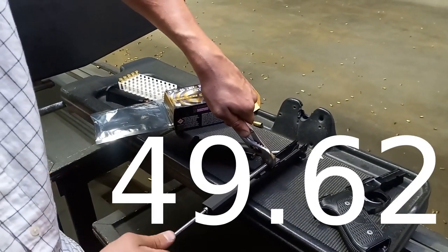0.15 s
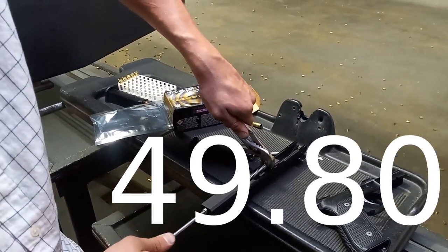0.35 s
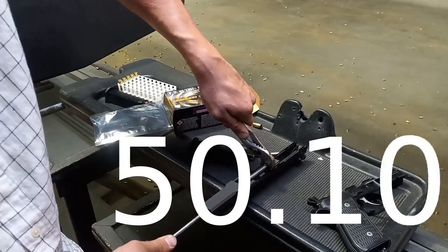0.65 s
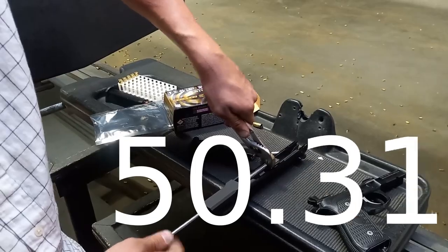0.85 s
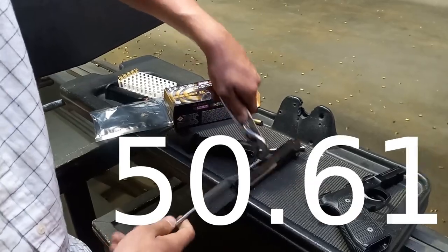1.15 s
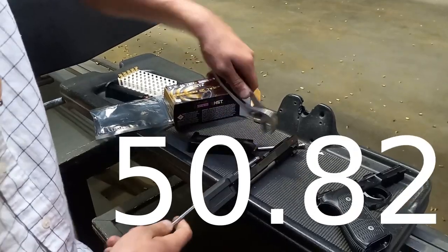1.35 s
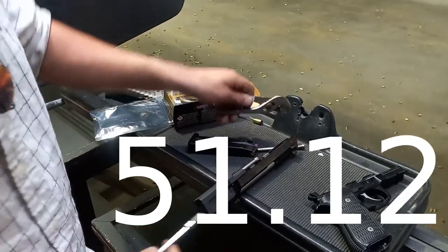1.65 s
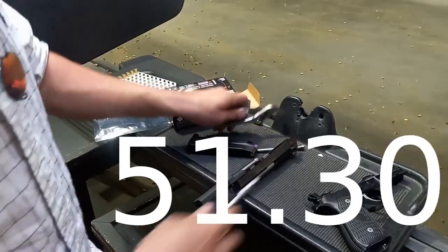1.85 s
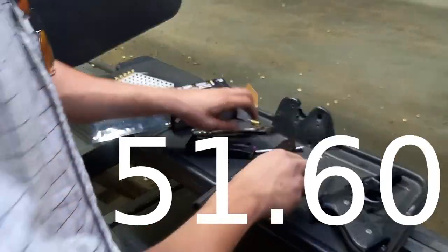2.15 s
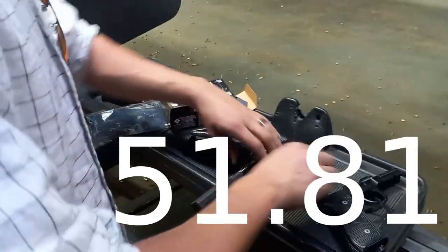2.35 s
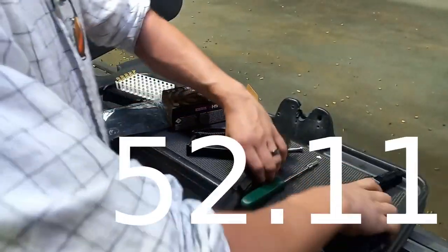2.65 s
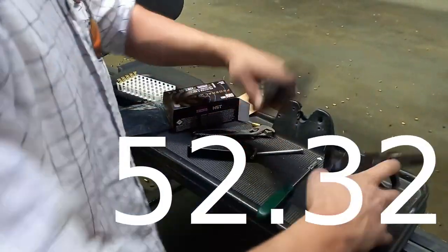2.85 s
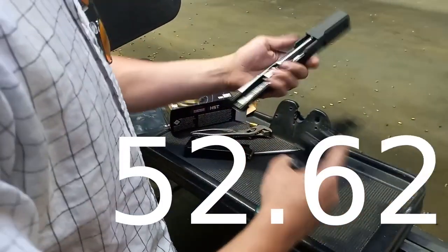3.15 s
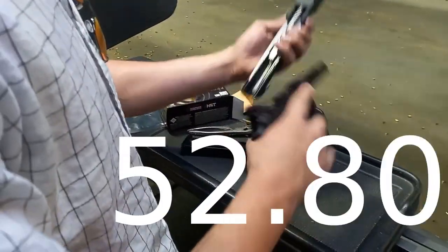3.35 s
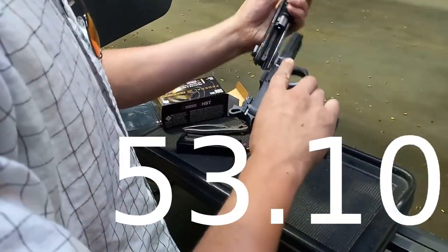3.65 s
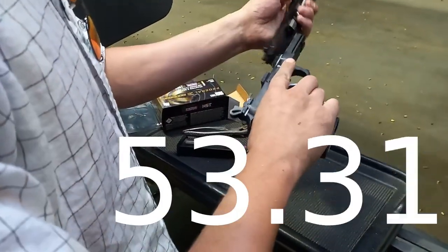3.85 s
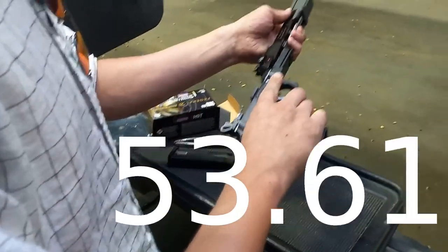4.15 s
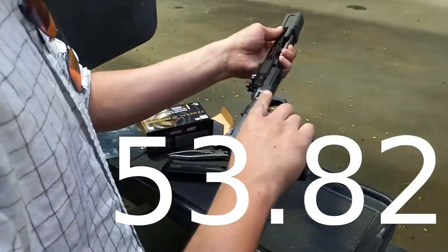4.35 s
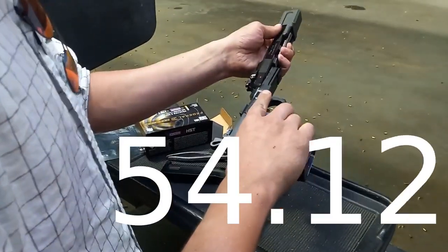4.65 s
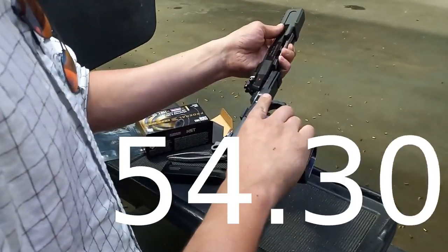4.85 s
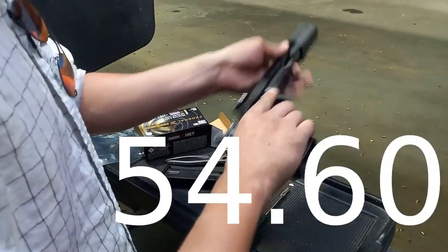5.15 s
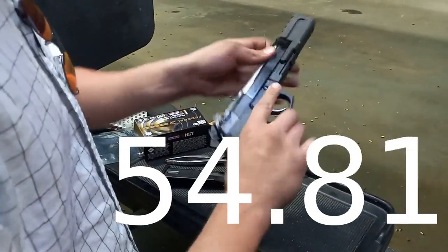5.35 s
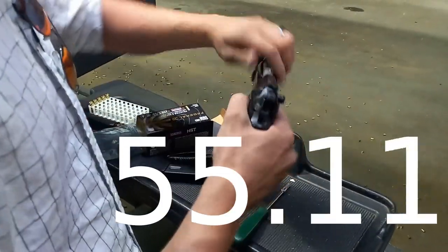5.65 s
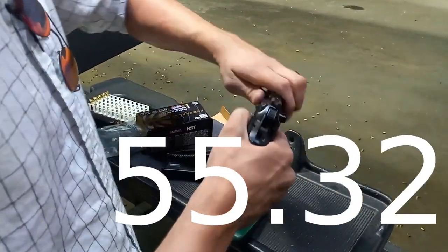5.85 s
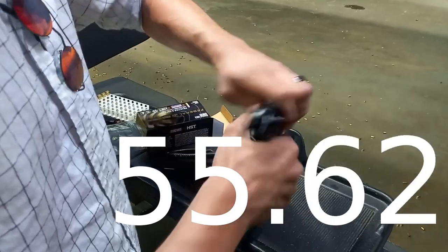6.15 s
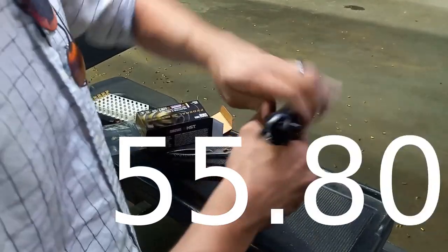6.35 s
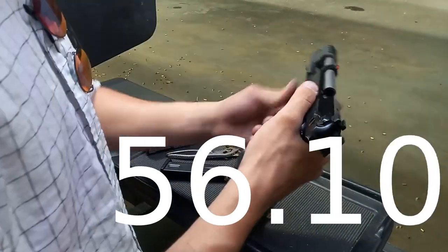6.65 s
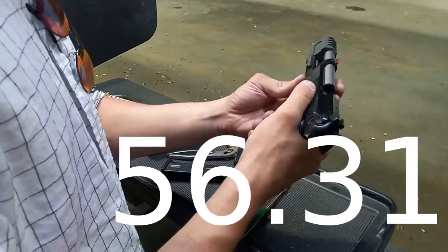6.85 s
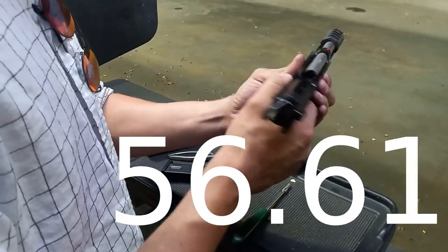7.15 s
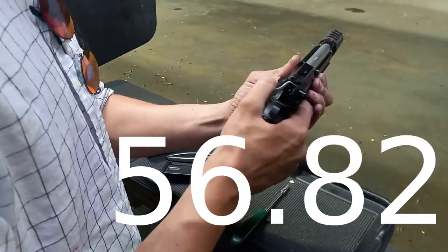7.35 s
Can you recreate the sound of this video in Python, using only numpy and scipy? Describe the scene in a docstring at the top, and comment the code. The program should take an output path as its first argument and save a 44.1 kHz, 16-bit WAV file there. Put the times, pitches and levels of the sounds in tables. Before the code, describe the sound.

A low, steady ventilation hum around 90 Hz with a soft rush of air lies under everything in a roomy, hard-walled indoor range; its level drifts, quieter near 3 s. Close up, faint rubs and tiny ticks occupy the first second, with a clearer click and dull tap of pliers at 1.2 s. From 2.0 to 2.4 s tools clatter onto a hollow plastic case, with woody thuds and bright clinks, then small fading rocking knocks to about 2.65 s. Sparse soft ticks and a faint rub follow. Firm steel clicks with slight spring pings come at 3.95, 4.05, 4.35 and 4.7 s. After a thin squeak at 4.9 s, quick ticks and a rasp rising in pitch slam into hard snaps at 5.25-5.3 s. A sharp cluster cracks at 6.2-6.35 s; after a rub at 6.7 s, single snaps hit at 7.0 and 7.37 s, echoing about half a second while the hum ducks.

```python
"""At a bench in an indoor range a pistol is reassembled, over the hum and rush of the ventilation.
Duct resonances shape the ventilation noise; damped noise and struck modes make knocks on a plastic case,
clinks of tools and ticks of small parts; chattering noise makes the rubs and the closing slide.
Slide and hammer then snap: a limiter clamps on the loud snaps, so the hum ducks, and as it lets go
the hall's tail swells up."""
import sys
import numpy as np
from scipy import signal
from scipy.fft import rfft, irfft, next_fast_len
from scipy.io import wavfile
from scipy.ndimage import uniform_filter1d, minimum_filter1d

SR = 44100
rng = np.random.default_rng(int(sys.argv[2]) if len(sys.argv) > 2 else 0)


def persist_wave(psi):
    """Save psi, clipped to +-1, as 16-bit WAV."""
    counts = np.round(np.clip(psi, -1, 1) * 32767).astype(np.int16)
    wavfile.write(sys.argv[1], SR, np.atleast_2d(counts).T)


N = 330750  # samples, 7.5 s

# Level of the ventilation hum. Each row: time in seconds, level in dB.
VENT_LEVEL = [(0, -45), (1.1, -45.5), (1.9, -48.5), (2.2, -48.5), (3.2, -55), (3.8, -50), (4.05, -45),
              (4.6, -45.5), (5.15, -46), (5.9, -51.5), (6.8, -47), (7.25, -47.5)]
# Spectrum of the rush of air. Each row: frequency in Hz, relative level in dB.
RUSH_SPECTRUM = [(60, -53), (110, -15.5), (190, -12.5), (330, -13.5), (430, -23.5), (525, -20.5),
                 (620, -23), (960, -27), (1130, -21.5), (1430, -36), (2200, -36), (7100, -56.5),
                 (13000, -51.5), (16000, -54)]
# Resonances of the duct. Each row: frequency in Hz, width in Hz, relative level in dB.
DUCT_RESONANCES = [(59.3, 4.1, -27.5), (89.1, 3.4, 0), (110.9, 29.4, -8.5)]
# Likeness of the rush in the two channels. Each row: frequency in Hz, correlation from 0 to 1.
RUSH_LIKENESS = [(60, 1.0), (180, 0.99), (550, 0.98), (1650, 0.13), (4970, 0.02), (15000, 0.48)]
RUSH_DB = -57.5  # level of the rush when the hum is at its mean level
RUSH_FOLLOWS = 0.93  # share of the hum's swings in dB that the rush follows

# Decay of the hall. Each row: frequency in Hz, t60 in seconds.
HALL_DECAY = [(150, 0.58), (1000, 0.56), (2700, 0.57), (7000, 0.6), (12000, 0.5), (16000, 0.26)]
# Balance of the nearby sounds. Each row: frequency in Hz, left gain minus right gain in dB.
PORT_BALANCE = [(500, -0.5), (1400, 1.5), (2800, -8), (5500, 4.5), (9000, 5.5), (14000, 2.5)]

# Strokes of hands and steel. Each row: start in seconds, length in seconds, body in dB, treble in dB.
RUBS = [(0.225, 0.22, -60.5, -72), (0.697, 0.27, -68, -69.5), (2.97, .12, -73.5, -71.5),
        (3.589, 0.34, -69, -78.5), (4.053, 0.46, -65.5, -73.5), (6.574, 0.24, -65.5, -73.5),
        (6.717, .17, -51, -64)]
# Spectrum of a rub. Each row: frequency in Hz, relative level in dB.
RUB_SPECTRUM = [(530, -52), (900, -10), (1120, -1.5), (1530, -14.5), (2250, -2.5), (4680, -20),
                (5550, -19.5), (8660, -21.5), (11600, -15.5), (16000, -28)]
RUB_RISE_S, RUB_HOLD_S, RUB_FADE_DB = 0.025, 0.035, -1.5  # a stroke takes hold, then eases off

# Light ticks of steel parts. Each row: start in seconds, body in dB before the common trim,
# treble in dB over the body.
TICKS = [(0.0812, -53, -11), (0.975, -56.5, -6.5), (1.142, -55.5, 4.5), (1.236, -42.5, -5),
         (1.4944, -59, 5), (2.7615, -52, 1), (2.9059, -56.5, 9.5), (3.149, -64.5, 7), (3.3829, -57.5, 2.5),
         (3.923, -58.5, -2), (3.958, -34.5, -7.5), (4.053, -34, -10.5), (4.118, -52.5, 4),
         (4.3394, -32.5, -17), (4.5668, -50, 0.5), (4.7083, -42.5, 1), (4.8595, -46, -20),
         (4.927, -50.5, -7.5), (5.0813, -43.5, -17), (5.1115, -52.5, -5.5), (5.153, -42, 0),
         (5.205, -40, -7), (5.2265, -32, -10.5), (7.2082, -48, -8), (7.276, -55.5, -20)]
# Spectrum of a tick. Each row: frequency in Hz, relative level in dB.
TICK_SPECTRUM = [(400, -25), (800, -4), (1600, 3), (2200, 4), (2900, -5.5), (3800, -5), (5200, -10),
                 (6100, -2), (7000, -7.5), (9700, -11), (13700, -12.5), (16000, -35)]

# Tools and parts set down on the case. Each row: start in seconds, body in dB before the common trims,
# treble in dB over the body, thud in dB over the body.
KNOCKS = [(1.236, -43, -6, 6.5), (1.2536, -49, -19, 10), (1.2865, -48, -17, 11.5), (2.0196, -30, -21, -3),
          (2.046, -34, -12.5, -0.5), (2.0721, -44, -10, 6.5), (2.2103, -45.5, -25, 6),
          (2.327, -39.5, -11, 6.5), (2.3495, -31.5, -13.5, -11), (2.3647, -32.5, -25, -8),
          (2.4111, -33, -25, -2.5), (2.775, -56.5, -25, 8)]
# Spectrum of the clack. Each row: frequency in Hz, relative level in dB.
KNOCK_SPECTRUM = [(410, -19.5), (700, 4.5), (875, 0), (1680, -3.5), (2270, 1.5), (3990, -22), (5330, -30),
                  (6150, -26), (6650, -29), (13700, -33), (16000, -32)]
# Resonance of the hollow case. Each row: frequency in Hz, relative level in dB.
CASE_HOLLOW = [(70, -35), (120, -6), (165, 6.5), (215, 4.5), (280, -2.5), (360, 1), (463, -4), (560, -10.5),
               (700, -21), (880, -10), (1100, -23.5), (1500, -18.5), (3000, -50)]
# Modes of the case walls. Each row: frequency in Hz, relative level in dB, t60 in seconds.
WALL_MODES = [(219.7, -2.5, 0.69), (303.3, -1, 0.67), (357.7, -4, 0.43), (467, 1, 0.6), (677, -8, 0.38),
              (840, -5.5, 0.24), (875, -9, 0.43), (1230, -23, 0.19)]
# The case rocks to rest in even, fading knocks; the levels are those of the first, read as in KNOCKS.
ROCK_FROM_S, ROCK_EVERY_S, ROCK_FADE_DB = 2.531, 0.034, -6.5  # fade per knock
ROCK_DB, ROCK_TREBLE_DB, ROCK_THUD_DB = -49, -32, 6

# Loose steel tools clink together. Each row: start in seconds, level in dB.
CLINKS = [(2.020, -56), (2.089, -57), (2.155, -37.5), (2.195, -45), (2.212, -49), (2.243, -46.5),
          (2.308, -63), (2.411, -61)]
# Modes of the tools. Each row: frequency in Hz, relative level in dB, t60 in seconds.
TOOL_MODES = [(4310, -8.5, 0.14), (5820, -9, 0.17), (8100, 3, 0.049), (8600, -7, 0.3), (9270, 3, 0.072),
              (10300, -10, 0.083), (10600, 4.5, 0.034), (11200, -13, .08), (12350, -2, .09),
              (13500, 5, 0.13), (14000, -9, .07), (14750, -14, .13), (15600, -11, .13)]
# The pliers' jaws touch. Each row: start in seconds, level in dB.
JAW_TOUCHES = [(1.142, -73), (1.236, -38), (1.288, -53.5), (1.498, -58), (2.763, -62), (2.906, -51)]
# Modes of the jaws. Each row: frequency in Hz, relative level in dB, t60 in seconds.
JAW_MODES = [(3000, -0.5, 0.029), (3790, -11.5, 0.17), (4360, 5, 0.025), (5060, 2.5, 0.032),
             (10570, -7, 0.058)]
# The recoil spring pings as the slide moves. Each row: start in seconds, level in dB.
PINGS = [(3.959, -59), (4.054, -58), (4.119, -58), (4.340, -56), (4.568, -55), (4.709, -42), (4.862, -62)]
# Modes of the spring. Each row: frequency in Hz, relative level in dB, t60 in seconds.
SPRING_MODES = [(6150, 5.5, 0.033), (7111, -25, 0.13), (9640, 0, 0.18)]

# A short squeak of steel on steel, sagging in pitch.
SQUEAK_S, SQUEAK_LENGTH_S, SQUEAK_DB = 4.926, 0.105, -69
SQUEAK_HZ, SQUEAK_SAG_HZ_PER_S = 6820, 2700
# The slide is pushed home, gathering speed; pitch and level follow the speed.
SLIDE_FROM_S, SLIDE_LENGTH_S, SLIDE_SPEEDUP = 5.2, 0.099, 3.1  # the last is the exponent of the speed
SLIDE_SLOW_HZ, SLIDE_FAST_HZ, SLIDE_SLOW_DB, SLIDE_FAST_DB = 1570, 2735, -55, -25

# Hard snaps of slide, lever and hammer. Each row: start in seconds, body in dB, treble in dB over
# the body, ring of the frame in Hz.
SNAPS = [(5.253, -43.5, -3, 2280), (5.275, -41, 3.5, 1940), (5.292, -31, 4, 2800), (6.214, -52.5, 9, 2500),
         (6.224, -50.5, 6, 2230), (6.242, -56, 10, 2576), (6.255, -33, 6, 2180), (6.296, -29.5, 3, 2000),
         (6.349, -35.5, 5.5, 2600), (7.025, -28.5, 0, 3220), (7.343, -51.5, 13, 2500),
         (7.371, -30, 4, 1970), (7.38, -32.5, 7, 2120)]
# Spectrum of a snap. Each row: frequency in Hz, relative level in dB.
SNAP_SPECTRUM = [(300, -28), (600, -14.5), (1400, -12), (2100, -1.5), (3100, 0), (4100, -13), (6100, -9.5),
                 (8200, -13.5), (12000, -5), (15000, -11), (16000, -46)]
# Sprung part worked by each move. Each row: start in seconds, ring of the part in Hz,
# left gain minus right gain in dB.
MOVES = [(5.1, 13500, 2.5), (6.1, 12100, 2), (6.9, 11250, -0.5)]

CEILING_DB = -38  # short-term treble power above which the limiter acts
EDGE_HZ = 16100  # upper band limit


def amp(db):
    """A level in decibels is twenty times the logarithm of the gain."""
    return 10 ** (np.asarray(db) / 20)


def evened(x):
    """Normalisation: mean power sets the level, so the rms is scaled to 1."""
    return x / np.sqrt(np.mean(x ** 2) + 1e-30)


def peaked(x, size=176):
    """Short-term power: the loudest window of the given samples (4 ms if not given) gets an rms of 1."""
    return x / np.sqrt(uniform_filter1d((x ** 2).mean(0), size).max())


def read(points, hz):
    """Interpolation of a table along a logarithmic frequency axis."""
    f, value = np.transpose(points)
    return np.interp(np.log(hz + 1), np.log(f + 1), value)


def add(mix, s, sound):
    """Superposition: a sound is added to the stereo mix at time s."""
    part = mix[:, max(round(s * SR), 0):][:, :sound.shape[1]]
    part += sound[:, :part.shape[1]]


def colour(x, db_of):
    """Minimum-phase filtering: the folded cepstrum makes the gain db_of(Hz) causal."""
    size = 2 * next_fast_len(x.shape[-1] // 2 + 1024)
    gain = amp(db_of(np.fft.rfftfreq(size, 1 / SR)))
    cepstrum = irfft(np.log(gain + 1e-6))
    cepstrum[1:size // 2] *= 2
    cepstrum[size // 2 + 1:] = 0
    response = np.exp(rfft(cepstrum))
    return irfft(rfft(x, size) * response)[..., :x.shape[-1]]


def pair(size, same):
    """Partial coherence: two channels of white noise have the given correlation."""
    a, b = rng.standard_normal((2, size))
    return np.array([a, same * a + np.sqrt(1 - same ** 2) * b])


def two_bands(x, spectrum, split_hz=4700):
    """Crossover: coloured sound is parted into body and treble at the split frequency."""
    body = colour(x, lambda f: read(spectrum, f) - 10 * np.log10(1 + (f / split_hz) ** 10))
    treble = colour(x, lambda f: read(spectrum, f) - 10 * np.log10(1 + (split_hz / (f + 1)) ** 10))
    return body, treble


def chatter(size, depth_db, count):
    """Stick-slip: surfaces that catch, slip and bounce give an uneven gain, smoothed over count samples."""
    return amp(depth_db * evened(uniform_filter1d(rng.standard_normal(size), count)))


def left_first(x, count):
    """Time difference of arrival: sound from the left reaches the right port count samples later."""
    return np.array([x[0], np.pad(x[1], (count, 0))[:N]])


def contact(body_db, treble_db, spectrum, t60, ring_db, ring_t60, same, chatter_db):
    """Impact: a crack of dense, quickly damped modes, then a weaker, chattering after-ring."""
    t = np.arange(SR // 5) / SR
    after_ring = amp(ring_db - 60 * t / ring_t60) * chatter(len(t), chatter_db, count=130)
    onset = 1 - np.exp(-t / 0.0004)
    fall = (amp(-60 * t / t60) + after_ring) * onset
    body, treble = two_bands(pair(len(t), same) * fall, spectrum)
    return amp(body_db) * (peaked(body) + amp(treble_db) * peaked(treble))


def damped_ring(hz, width_hz, t60):
    """Damped resonance: a cluster of close modes of hand-held steel dies exponentially."""
    t = np.arange(SR // 3) / SR
    cluster = colour(pair(len(t), 0.77), lambda f: -20 * np.log10(1 + ((f - hz) / width_hz) ** 2))
    return evened(cluster) * amp(-60 * t / t60)


def ringing(blows, modes, beat_hz, beat_share, crack_db, crack_t60, spread_db=9):
    """Modal vibration: free steel rings in close, beating pairs of modes, weighted anew by every blow."""
    out, t = np.zeros((2, N)), np.arange(SR * 3 // 4) / SR
    hz, db, t60 = np.transpose(modes)[:, :, None]
    for s, blow_db in blows:
        luck, phase, split = rng.random((3, 2, len(modes), 1))
        twin_hz = hz + beat_hz * (split + 0.5)
        pairs = np.sin(2 * np.pi * (hz * t + phase)) + beat_share * np.sin(2 * np.pi * twin_hz * t)
        decay = amp(db + spread_db * (luck - 0.5) - 60 * t / t60)
        ring = (decay * pairs).sum(1)
        crack = np.diff(pair(len(t) + 1, 0.3)) * amp(-60 * t / crack_t60)
        add(out, s, amp(blow_db) * (peaked(ring) + amp(crack_db) * peaked(crack)))
    return out


def ventilation(tone_share=0.34, tone_hz=90):
    """Duct resonance: a fan tone and turbulence boom in the duct, under a broad rush of air."""
    t, f = np.arange(N) / SR, np.fft.rfftfreq(N, 1 / SR)
    level_db = np.interp(t, *np.transpose(VENT_LEVEL))
    a, b, turbulence = rfft(rng.standard_normal((3, N)))
    duct = sum(amp(db) / (1 + ((f - hz) / width) ** 2) for hz, width, db in DUCT_RESONANCES)
    boom = evened(irfft(turbulence * duct, N))
    hum = evened(boom + tone_share * np.sin(2 * np.pi * tone_hz * t))
    same = np.clip(read(RUSH_LIKENESS, f), 0, 1)
    air = np.array([a, same * a + np.sqrt(1 - same ** 2) * b])
    rush = evened(irfft(air * amp(read(RUSH_SPECTRUM, f)), N))
    rush_db = RUSH_DB + RUSH_FOLLOWS * (level_db - level_db.mean())
    return hum * amp(level_db) + rush * amp(rush_db)


def hall(x, rise_s=0.0023):
    """Reverberation: a diffuse tail builds up, then each band decays at its own rate."""
    hz, t, z = signal.stft(rng.standard_normal((2, SR)), SR, nperseg=256)
    decay = amp(-60 * t / read(HALL_DECAY, hz)[:, None]) * (1 - np.exp(-t / rise_s))
    tail = signal.istft(z * decay, SR, nperseg=256)[1]
    return signal.fftconvolve(x.mean(0)[None], tail / np.linalg.norm(tail[0]), axes=1)[:, :N]


def rubs(grain_db=3):
    """Friction: surfaces that catch and slip every few milliseconds give a grainy hiss."""
    out = np.zeros((2, N))
    for s, length, body_db, treble_db in RUBS:
        t = np.arange(0, length, 1 / SR)
        easing = amp(RUB_FADE_DB * np.maximum(t - RUB_HOLD_S, 0) / length) * np.cos(np.pi / 2 * t / length)
        pressure = np.minimum(t / RUB_RISE_S, 1) * easing
        grain = chatter(len(t), grain_db, count=150)
        body, treble = two_bands(pair(len(t), 0.27) * grain, RUB_SPECTRUM)
        hiss = evened(body) * amp(body_db) + evened(treble) * amp(treble_db)
        add(out, s, hiss * pressure)
    return out


def squeak():
    """Frictional oscillation: dry steel whistles thinly at a falling pitch."""
    out, t = np.zeros((2, N)), np.arange(0, SQUEAK_LENGTH_S, 1 / SR)
    hz = SQUEAK_HZ - SQUEAK_SAG_HZ_PER_S * t
    tone = np.sin(2 * np.pi * np.cumsum(hz) / SR)
    swell = np.sqrt(np.sin(np.pi * t / SQUEAK_LENGTH_S))
    add(out, SQUEAK_S, amp(SQUEAK_DB) * (tone * swell)[None])
    return out


def ticks(level_db=-6.0, frame_db=-11, frame_hz=2800):
    """Damped impact: small parts touch, damped by the hands, and the frame rings briefly."""
    out = np.zeros((2, N))
    for s, body_db, treble_db in TICKS:
        add(out, s, contact(body_db + level_db, treble_db, TICK_SPECTRUM, t60=0.041,
                            ring_db=-21, ring_t60=0.37, same=0.24, chatter_db=1.0))
        add(out, s, amp(body_db + frame_db) * damped_ring(frame_hz, width_hz=380, t60=0.086))
    return out


def knocks(level_db=-4, thud_level_db=-3, thud_t60=0.27, thud_rise_s=0.0029, wall_db=-12, count=4):
    """Cavity and plate resonance: after a hard clack the hollow case thuds and its walls ring."""
    out, t = np.zeros((2, N)), np.arange(SR // 2) / SR
    rise = 1 - np.exp(-t / thud_rise_s)
    rocking = [(ROCK_FROM_S + k * ROCK_EVERY_S, ROCK_DB + k * ROCK_FADE_DB, ROCK_TREBLE_DB, ROCK_THUD_DB)
               for k in range(count)]
    for s, body_db, treble_db, thud_db in KNOCKS + rocking:
        add(out, s, contact(body_db + level_db, treble_db, KNOCK_SPECTRUM, t60=0.028,
                            ring_db=-13, ring_t60=0.14, same=0.8, chatter_db=3))
        push = pair(len(t), 1.0) * amp(-60 * t / thud_t60) * rise
        thud = peaked(colour(push, lambda f: read(CASE_HOLLOW, f)), size=600)
        add(out, s, amp(body_db + thud_db + thud_level_db) * thud)
        walls = sum(amp(db - 60 * t / t60) * np.sin(2 * np.pi * (hz * t + rng.random()))
                    for hz, db, t60 in WALL_MODES)
        add(out, s, amp(body_db + wall_db) * peaked((walls * rise)[None], size=600))
    return out


def slide(width_hz=480, grain_db=3.5, rasp_db=-11, rise_s=0.015):
    """Friction-driven resonance: steel scrapes in uneven slips, and its pitch climbs with the speed."""
    out, t = np.zeros((2, N)), np.arange(0, SLIDE_LENGTH_S, 1 / SR)
    speed = (t / SLIDE_LENGTH_S) ** SLIDE_SPEEDUP
    hz = SLIDE_SLOW_HZ + (SLIDE_FAST_HZ - SLIDE_SLOW_HZ) * speed
    level_db = SLIDE_SLOW_DB + (SLIDE_FAST_DB - SLIDE_SLOW_DB) * speed
    slips = pair(len(t), 0.23) * chatter(len(t), grain_db, count=100)
    # shift the moving resonance down to 0 Hz, filter there, and shift back
    turn = np.exp(2j * np.pi * np.cumsum(hz) / SR)
    pole = np.exp(-np.pi * width_hz / SR)
    scrape = (turn * signal.lfilter([1], np.poly([pole, pole]), slips / turn)).real
    sound = evened(scrape) + amp(rasp_db) * evened(slips)
    add(out, SLIDE_FROM_S, sound * amp(level_db) * np.minimum(t / rise_s, 1))
    return out


def snaps(frame_db=-8, part_db=-15, twin_db=-19, twin_hz=800):
    """Impact excitation: sprung steel slams on its stops; the frame and two modes of the part ring on."""
    out = np.zeros((2, N))
    for s, body_db, treble_db, frame_hz in SNAPS:
        _, part_hz, left_db = [move for move in MOVES if move[0] <= s][-1]
        side = amp([[left_db / 2], [-left_db / 2]])
        add(out, s, side * contact(body_db, treble_db, SNAP_SPECTRUM, t60=0.041,
                                   ring_db=-30, ring_t60=0.41, same=0.12, chatter_db=6.0))
        frame = amp(frame_db) * damped_ring(frame_hz, width_hz=107, t60=0.12)
        part = amp(treble_db + part_db) * damped_ring(part_hz, width_hz=230, t60=0.26)
        twin = amp(treble_db + twin_db) * damped_ring(part_hz + twin_hz, width_hz=130, t60=0.43)
        add(out, s, side * amp(body_db) * (frame + part + twin))
    return out


def scene():
    """Direct and reverberant field: most bench sounds reach the left port first and excite the hall."""
    air = left_first(ventilation(), count=13)
    light, case = ticks(), knocks()
    tools = ringing(CLINKS, TOOL_MODES, beat_hz=109, beat_share=0.52,
                    crack_db=-0.5, crack_t60=0.025, spread_db=20)
    jaws = ringing(JAW_TOUCHES, JAW_MODES, beat_hz=32.2, beat_share=0.53, crack_db=-3, crack_t60=0.02)
    spring = ringing(PINGS, SPRING_MODES, beat_hz=5.0, beat_share=0.09, crack_db=-6.0, crack_t60=0.015)
    hard = squeak() + slide() + snaps()
    near = left_first(case + rubs(), count=7) + left_first(light + hard + tools + jaws, count=2) + spring
    far = hall(amp(-26) * light + amp(-10) * hard + amp(-14.0) * case + amp(-18) * tools)
    tilt_db = read(PORT_BALANCE, np.fft.rfftfreq(N, 1 / SR)) / 2
    balanced = irfft(rfft(near) * amp([tilt_db, -tilt_db]), N)
    return air + far + balanced


def recovering(cut_db, db_per_s):
    """Release: a gain cut lets go no faster than the given rate."""
    fall = np.arange(N) * db_per_s / SR
    return np.maximum.accumulate(cut_db + fall) - fall


def record(dry, hold_s=0.051, ahead_s=0.00061, release_db_per_s=500, linger_share=0.35, linger_db_per_s=18):
    """Limiting: treble peaks cut the gain just ahead, with a fast then slow release; then band limits."""
    sensed = signal.lfilter(*signal.butter(2, 4500, "high", fs=SR), dry)
    power_db = 10 * np.log10(abs(uniform_filter1d((sensed ** 2).mean(0), size=180)) + 1e-12)
    over_db = np.maximum(power_db - CEILING_DB, 0)
    # the sliding maximum starts a little early and holds on after the peak
    half = int((hold_s + ahead_s) * SR / 2)
    held_db = -minimum_filter1d(-over_db, 2 * half + 1, origin=half - int(ahead_s * SR))
    quick_db = recovering(held_db, release_db_per_s)
    slow_db = recovering(linger_share * held_db, linger_db_per_s)
    cut_db = uniform_filter1d(np.maximum(quick_db, slow_db), size=200)
    high_passed = signal.sosfilt(signal.butter(8, 48, "high", fs=SR, output="sos"), dry)
    low_pass = signal.firwin(301, EDGE_HZ, window=("kaiser", 8), fs=SR)
    return signal.oaconvolve(high_passed / amp(cut_db), low_pass[None], "same")


dry = scene()
out = record(dry)
persist_wave(out)
```